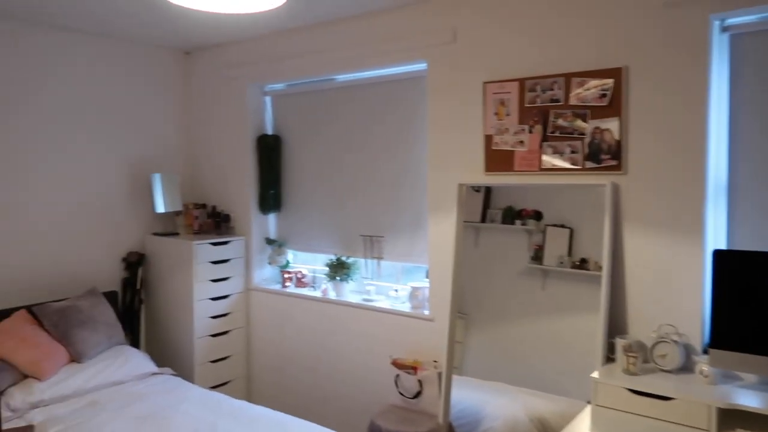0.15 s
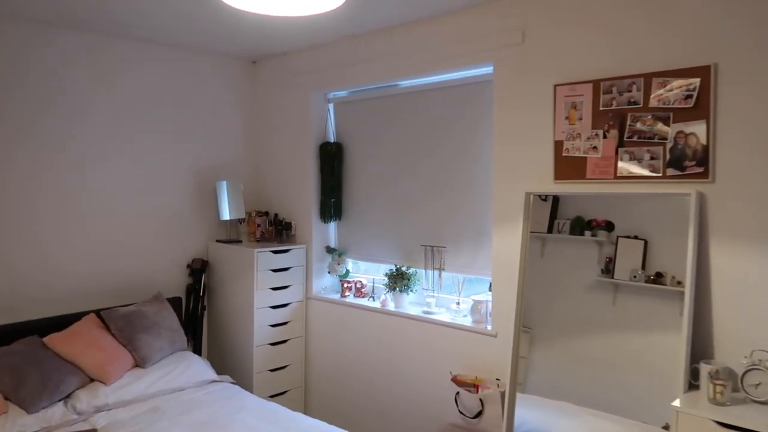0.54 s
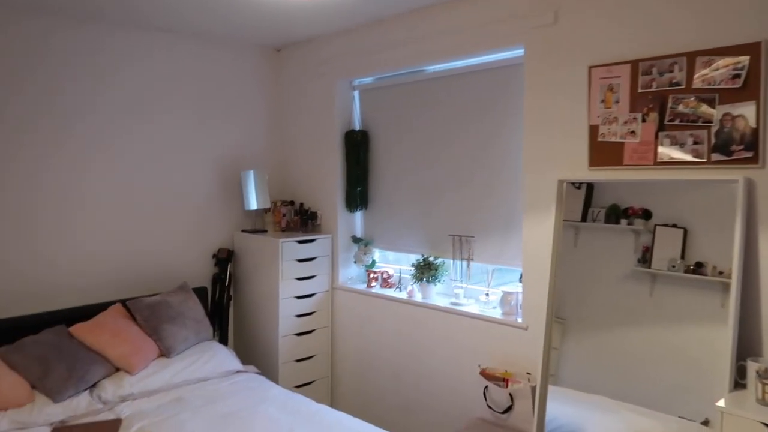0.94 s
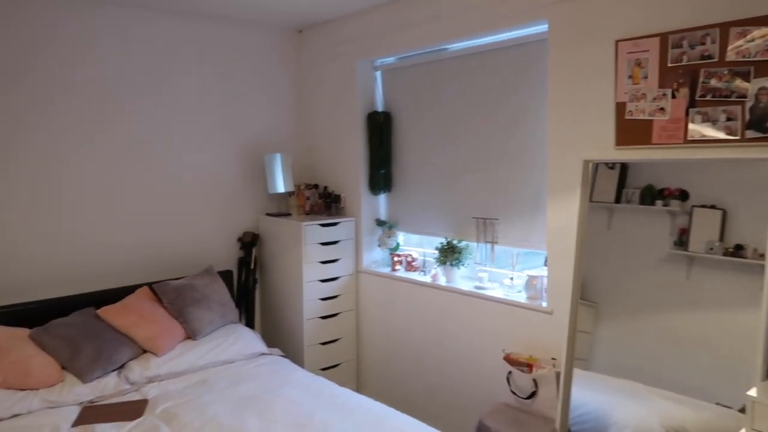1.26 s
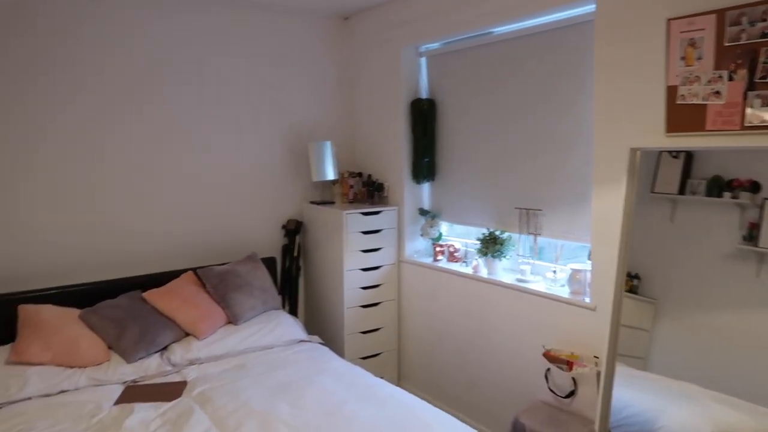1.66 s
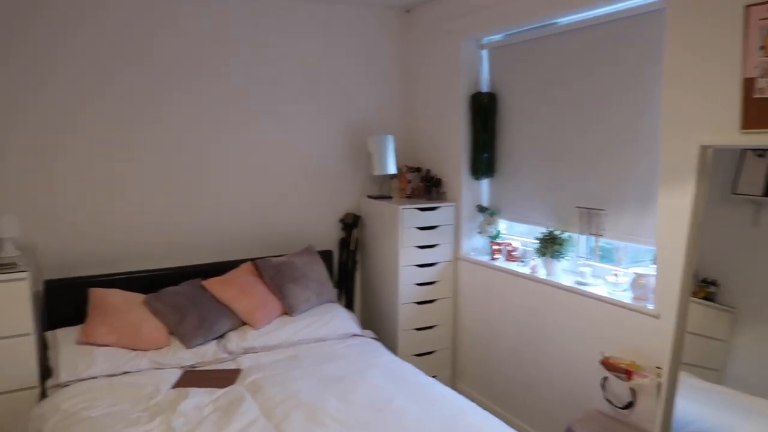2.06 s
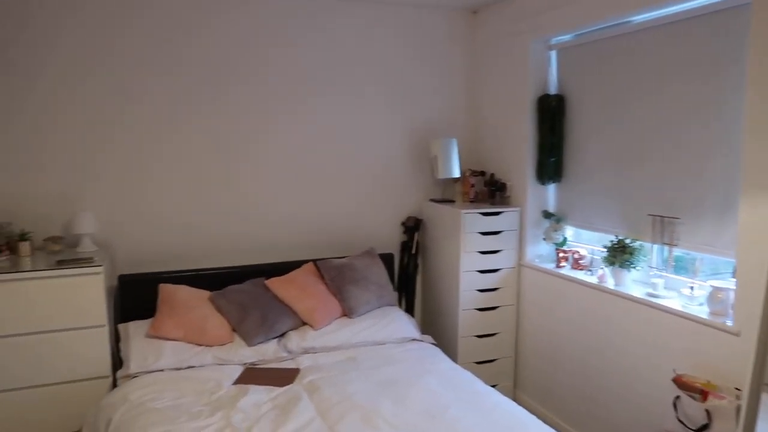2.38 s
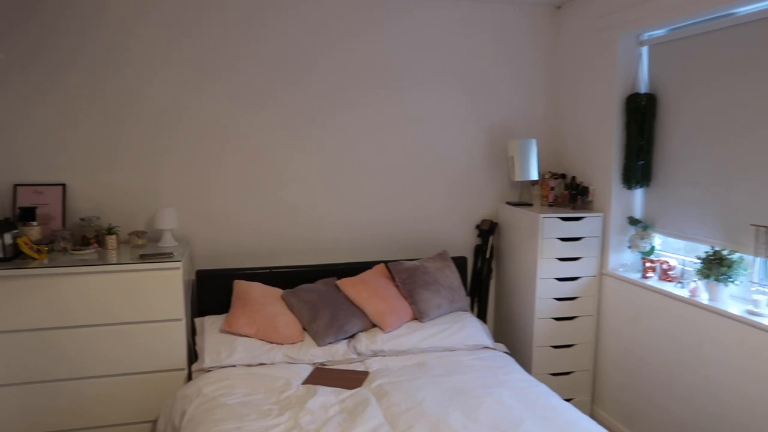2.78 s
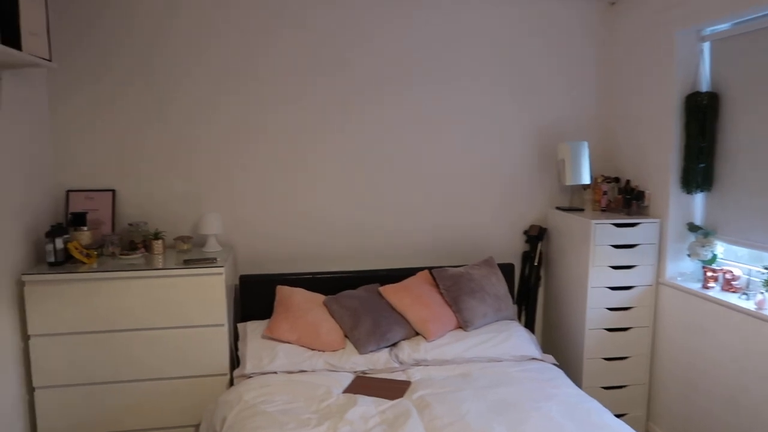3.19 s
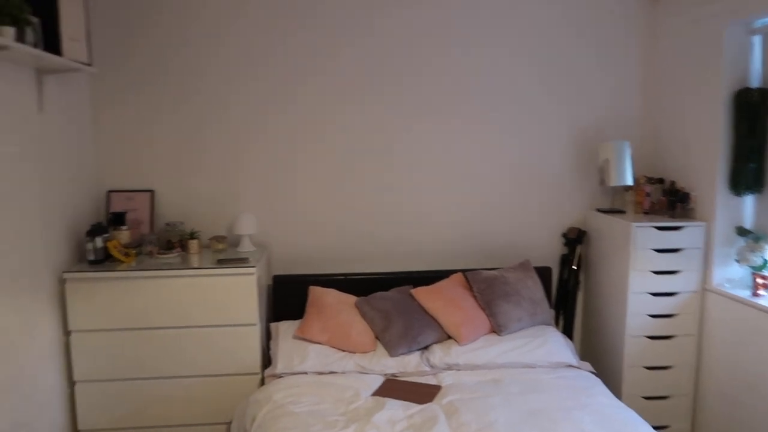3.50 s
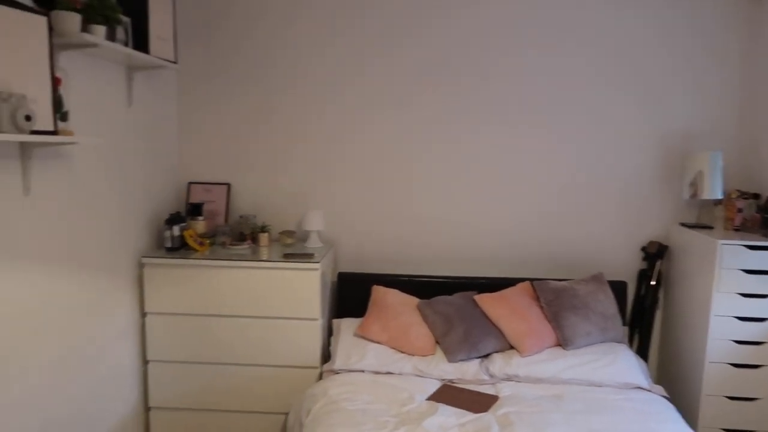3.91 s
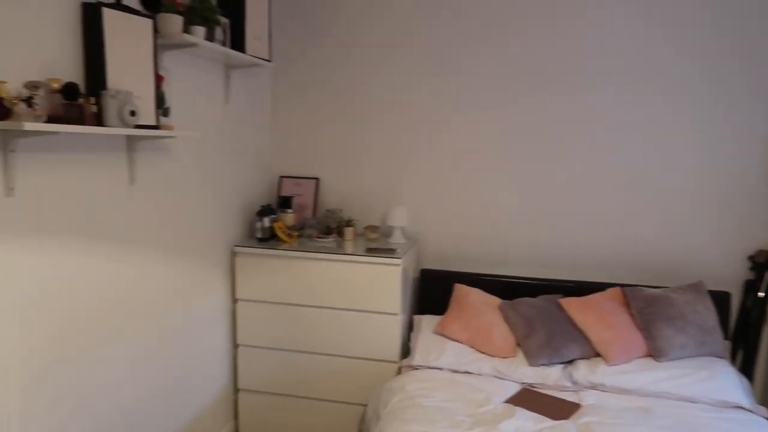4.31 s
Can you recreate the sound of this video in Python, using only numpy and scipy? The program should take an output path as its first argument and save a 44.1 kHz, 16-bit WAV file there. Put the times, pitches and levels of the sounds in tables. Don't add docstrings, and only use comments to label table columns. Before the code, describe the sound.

Slow, soft footsteps on a carpeted wooden floor in a quiet bedroom, low boards thudding, cloth rustling, faint mains hum and hiss beneath.

```python
import sys
import numpy as np
from scipy import signal
from scipy.io import wavfile

SR = 44100
rng = np.random.default_rng(int(sys.argv[2]) if len(sys.argv) > 2 else 0)


def volts_from_db(level):
    exponent = np.asarray(level, float) / 20
    return 10 ** exponent


def store_wav(level_fs):
    pcm = np.round(np.clip(np.atleast_2d(level_fs), -1, 1) * 32767)
    wavfile.write(sys.argv[1], SR, pcm.T.astype(np.int16))


N = 196200


def rms_one(x):
    return x / np.sqrt(np.mean(x ** 2) + 1e-20)


def at_hz(points, hz):
    points_hz, values = np.transpose(points)
    return np.interp(np.log(hz), np.log(points_hz), values)


def band(x, low_hz, high_hz):
    sos = signal.butter(2, [low_hz, high_hz], "band", fs=SR, output="sos")
    return signal.sosfilt(sos, x)


def drift(rate_hz):
    r = np.exp(-80 * np.pi * rate_hz / SR)
    noise = rng.standard_normal(N // 40 + 2002)
    slow = signal.lfilter([1], [1, -2 * r, r * r], noise)[2000:]
    return np.interp(np.arange(N) / 40, np.arange(len(slow)), rms_one(slow))


def ring(push, hz, t60):
    r = volts_from_db(-60 / (t60 * SR))
    w = 2 * np.pi * hz / SR
    return signal.lfilter([0, np.sin(w)], [1, -2 * r * np.cos(w), r * r], push)


def pair(mid, side, side_db):
    return mid + volts_from_db(side_db) * side * np.array([[1], [-1]])


def add(out, s, sound):
    at = round(s * SR)
    out[:, at:at + sound.shape[-1]] += sound[..., :N - at]


def banded_noise(spectrum, patchy_db):
    # frequency in Hz, side minus mid in dB.
    width = [(80, -18), (200, -4.5), (370, -1.5), (2500, -.6), (4300, 3), (5600, -0.5), (7900, -0.7),
             (14600, 1.1)]
    edges = 22 * 2 ** np.arange(0, 9.6, .5)
    white = rng.standard_normal((2, 2, N))
    out = 0
    for k, (low, high) in enumerate(zip(edges, edges[1:])):
        hz = np.sqrt(low * high)
        level = volts_from_db(at_hz(spectrum, hz) + patchy_db * drift(9.8))
        mid, side = band(white[k % 2], low, high)
        out = out + level * pair(mid, side, at_hz(width, hz))
    return out / np.std(band(out.mean(axis=0), 150, 15000))


def room_hiss():
    # frequency in Hz, level in dB per Hz.
    air = [(22, -15), (110, -10.5), (350, -11.5), (700, -19), (1200, -19.5), (5000, -30), (12000, -42),
           (15000, -51.5)]
    return volts_from_db(-57.5) * banded_noise(air, patchy_db=0.5)


def mains_hum():
    # time in seconds, second harmonic in dB, fundamental in dB.
    hum_levels = [(0.0, -58, -70), (0.47, -58.5, -71), (1.05, -68, -70), (1.5, -61.5, -68),
                  (1.89, -59, -67), (2.5, -59, -66), (3.3, -60.5, -66), (3.7, -70, -69), (4.1, -72, -60.5),
                  (4.45, -58.5, -68)]
    mains_hz, blur_width_hz = 50.7, 3.1
    t = np.arange(N) / SR
    s, second_points, first_points = np.transpose(hum_levels)
    second_db = np.interp(t, s, second_points)
    first_db = np.interp(t, s, first_points)
    turn = 2 * np.pi * mains_hz * t
    hum = np.sqrt(2) * (volts_from_db(first_db) * np.sin(turn) + volts_from_db(second_db - 1.5) * np.sin(2 * turn))
    blur = rms_one(ring(rng.standard_normal(N), 2.3 * mains_hz, 2.7 / blur_width_hz))
    return hum + blur * volts_from_db(second_db - 4.0)


def electronic_whine():
    # frequency in Hz, level in dB rms.
    tones = [
        (13001, -91),
        (13028, -92),
        (14282, -112),
    ]
    phase = np.array([[0.], [1.6]])
    out = np.zeros((2, N))
    for hz, db in tones:
        level = np.sqrt(2) * volts_from_db(db + 3.5 + 1.5 * drift(3))
        out += level * np.sin(2 * np.pi * hz * np.arange(N) / SR + phase)
    return out


def joist_rumble():
    # start in seconds, peak level in dB.
    loads = [
        (.56, -66),
        (1.35, -66),
        (2.2, -42),
        (2.5, -46),
        (2.9, -55.5),
        (3.86, -55),
    ]
    rise_s, rest_db = 0.085, -69.5
    t = np.arange(N) / SR
    load = np.zeros(N)
    for s, peak_db in loads:
        age = np.maximum(t - s, 0) / rise_s
        load += volts_from_db(peak_db) * age * np.exp(1 - age)
    rumble = rms_one(band(rng.standard_normal(N), 22, 89))
    return rumble * volts_from_db(-7) * (volts_from_db(rest_db) + load)


def brushing():
    # middle in seconds, half length in seconds, dull part in dB, bright part in dB.
    swishes = [(0.34, 0.07, -63.5, -64.5), (0.462, 0.089, -63.5, -81), (0.661, 0.059, -54.5, -64.5),
               (0.777, 0.031, -60.5, -65.5), (1.05, 0.1, -70, -90), (1.602, 0.017, -61, -84),
               (2.186, 0.26, -64.5, -68.5), (2.647, 0.058, -62, -62.5), (2.807, 0.083, -70, -66),
               (2.925, 0.052, -71.5, -60), (3.004, 0.064, -67, -68.5), (3.34, 0.029, -57.5, -66),
               (3.786, 0.094, -64.5, -86), (4.146, 0.03, -77, -74), (4.346, 0.12, -64, -76)]
    # frequency in Hz, level in dB per Hz.
    pile_colour = [(120, -51), (250, 4), (500, 3.5), (900, 0.5), (1600, -12.5), (2500, -22), (5000, -60)]
    # frequency in Hz, level in dB per Hz.
    cloth_colour = [(700, -36), (1500, 4.5), (3000, 5), (5000, -1.5), (8000, -11), (11000, -13),
                    (14000, -34)]
    t = np.arange(N) / SR
    dull, bright = np.zeros(N), np.zeros(N)
    for s, half, dull_db, bright_db in swishes:
        stroke = np.exp(-((t - s) / half) ** 2)
        dull += volts_from_db(dull_db) * stroke
        bright += volts_from_db(bright_db) * stroke
    pile = dull * banded_noise(pile_colour, patchy_db=2.5)
    cloth = bright * banded_noise(cloth_colour, patchy_db=1.2)
    return pile + cloth


def cloth_snaps():
    # start in seconds, peak level in dB, frequency in Hz.
    snaps = [
        (1.441, -48, 5100),
        (1.443, -52, 7200),
        (1.439, -50, 1500),
        (2.589, -48, 5000),
        (4.15, -60, 4300),
    ]
    out = np.zeros((2, N))
    t = np.arange(SR // 20) / SR
    for s, peak_db, hz in snaps:
        snap = rng.standard_normal((2, len(t))) * volts_from_db(peak_db - 60 * t / .04)
        snap = snap * np.minimum(t / .003, 1)
        add(out, s, 3 * band(snap, .88 * hz, 1.14 * hz))
    return out


def contact(colour, ring_factor, soft_ms, lead, count=210):
    # frequency in Hz, time to fall 60 dB in seconds.
    decay = [(30, 0.31), (100, 0.24), (250, 0.26), (500, 0.24), (1000, 0.19), (3000, 0.22), (7000, 0.15)]
    # frequency in Hz, side minus mid in dB.
    width = [(60, -53), (110, -68), (200, -44), (370, -22), (690, -38), (1700, -15), (4310, -6),
             (14600, -2.5)]
    low_hz, high_hz = 135, colour[-2][0]
    swell_cycles = 2.1
    place = rng.random(count)
    signs = rng.choice([-1, 1], (count, 2))
    spread = rng.standard_normal(count)
    hzs = low_hz * (high_hz / low_hz) ** (((np.arange(count) + place) / count) ** .75)

    sound = np.zeros((2, SR // 2))
    click = np.zeros(SR // 2)
    click[0] = 1
    start = SR // 10
    for hz, gap, (mid, side), chance in zip(hzs, np.gradient(hzs), signs, spread):
        t60 = at_hz(decay, hz) * ring_factor
        height = volts_from_db(at_hz(colour, hz) + 4.8 * chance) * np.sqrt(gap / t60)
        mode = ring(click, hz, t60)
        mode[:start] -= ring(click[:start], hz, min(swell_cycles / hz, .09))
        sound += height * pair(mid, side, at_hz(width, hz)) * mode

    samples = np.arange(len(click))
    sound *= 1 - np.exp(-samples / (SR * soft_ms / 1000))
    sound *= 1 + lead * np.exp(-samples / (SR * 0.016))
    return sound / np.std(sound[:, :SR // 25])


def board_ring(hz, level_db, t60):
    t = np.arange(SR) / SR
    swell = 1 - np.exp(-t * hz * 2.2)
    return volts_from_db(level_db - 60 * t / t60) * swell * np.sin(2 * np.pi * hz * t)


def footfalls():
    # start in seconds, level in dB, kind of contact, ring time factor, softness in ms,
    # lead of the direct blow over the ring (as a ratio).
    steps = [(0.525, -53.5, "soft", 0.5, 1.8, 0.65), (.560, -50.5, "soft", 0.79, 1.4, .8),
             (1.252, -42.5, "scuff", 1.4, 0.4, 1), (1.3402, -32.5, "knock", 1.09, 1.1, 0.61),
             (2.158, -30, "heel", 0.92, 0.6, 0.52), (2.222, -41, "roll", 1, 1.7, 0.31),
             (2.518, -53, "shift", 0.61, 3.6, 0.27), (2.644, -57, "settle", 0.75, 3.0, .3),
             (2.915, -60, "toe", .8, 2.5, .3), (3.468, -55, "toe", 0.31, 2.01, .3),
             (3.543, -47.5, "toe", 1, 1.4, .3), (3.8206, -34, "tap", 1.24, 0.92, 0.27)]
    colours = {"soft": [(71, -31), (120, -3.5), (248, -16.5), (561, -35), (600, -44), (780, -67),
               (1320, -120)], "scuff": [(71, -31), (200, 1), (850, -3.5), (1370, -11.5), (2500, -17.5),
               (5230, -35.5), (8450, -49), (14300, -120)], "knock": [(71, -28), (120, -15), (177, -7),
               (884, -16), (1460, -26), (2760, -33), (6500, -68), (11000, -120)], "heel": [(71, -30),
               (130, -9), (200, -4.5), (393, -15), (496, -19.5), (1030, -41), (1430, -81), (2420, -120)],
               "toe": [(71, -34), (120, -1.5), (408, -7), (561, -12.5), (613, -35), (700, -22), (910, -52),
               (1540, -120)], "tap": [(71, -38), (120, 0), (425, 4), (620, -11.5), (2200, -21.5),
               (3000, -37), (5460, -77), (9240, -120)]}
    same_colour = {"roll": "heel", "shift": "heel", "settle": "heel"}
    boards = {"soft": [(102, 13.5, 0.17)], "scuff": [(918, 4, 0.038)], "knock": [(102.7, 9.5, 0.21),
              (121.6, -5, 0.35), (63, -22, .3), (328, -15, 0.15), (893, -4.5, 0.13)],
              "heel": [(115.4, 11, 0.3), (87.8, -1.5, 1.08), (70.3, 14, 0.24), (39.6, 5, 0.45),
              (27.3, -9, 1.1), (216, 3, .22), (299, 1.5, 0.2)], "roll": [(102, -3, 0.29)],
              "shift": [(113, 12, 0.31), (57.6, 10.5, .38), (240, 4, 0.27)], "settle": [(82, 20, 0.13),
              (118, 10, 0.15)], "toe": [(71.5, 5.5, 0.2)]}
    # frequency in Hz, dB over the contact, t60 in seconds.
    loose_board = [(70.4, 3, 0.2), (122.5, -12, 0.59), (178.6, -1.5, 0.33), (237, -0.5, 0.22),
                   (318, -1.5, 0.25), (472, -5.5, .3), (524, 1, 0.15), (772, -9.5, 0.17), (1290, -24, 0.15),
                   (1930, -16, 0.12), (3470, -24.5, .11)]
    beam_db = {"soft": 4, "knock": -2.5, "shift": 4}
    board_lag_s, beam_lag_s = 0.00302, 0.0422
    beam_hz, beam_t60_s = 81, 0.36

    out = np.zeros((2, N))
    for s, level_db, kind, ring_factor, soft_ms, lead in steps:
        colour = colours[same_colour.get(kind, kind)]
        add(out, s, volts_from_db(level_db) * contact(colour, ring_factor, soft_ms, lead))
        for hz, over_db, t60 in boards.get(kind, loose_board):
            add(out, s + board_lag_s, board_ring(hz, level_db + over_db, t60))
        if kind in beam_db:
            add(out, s + beam_lag_s, board_ring(beam_hz, level_db + beam_db[kind], beam_t60_s))
    return out


def scene():
    background = room_hiss() + mains_hum() + electronic_whine()
    movement = joist_rumble() + brushing() + cloth_snaps()
    return background + movement + footfalls()


def low_pass(x):
    return signal.sosfilt(signal.butter(12, 15210, fs=SR, output="sos"), x)


def record(dry):
    sos = signal.cheby2(10, 50, 15500 * 1.02, fs=SR, output="sos")
    return low_pass(signal.sosfilt(sos, dry))


dry = scene()
out = record(dry)
store_wav(out)
```